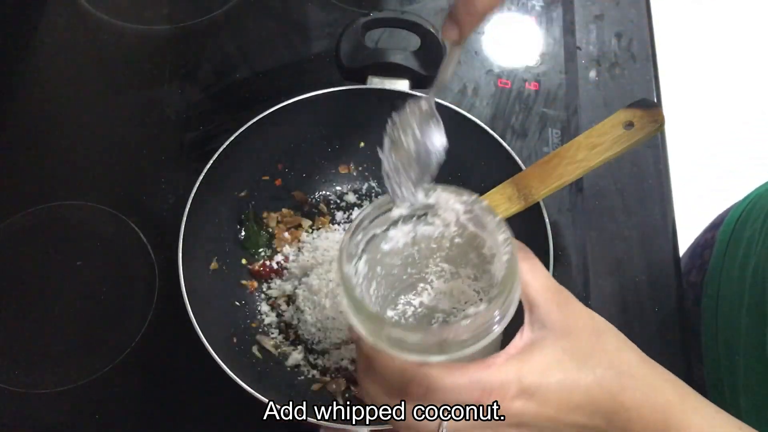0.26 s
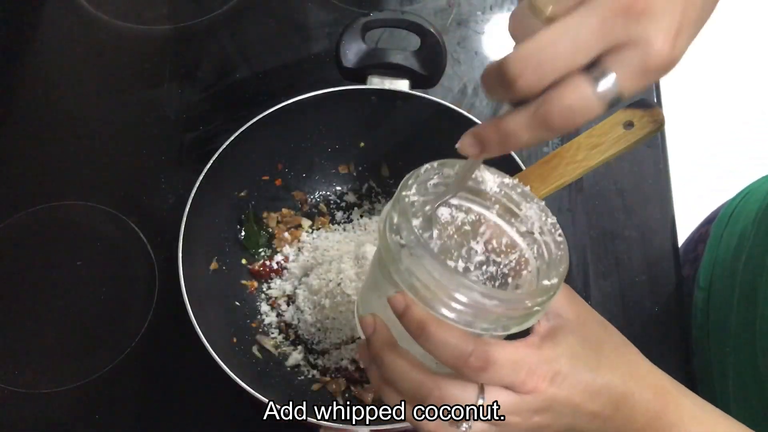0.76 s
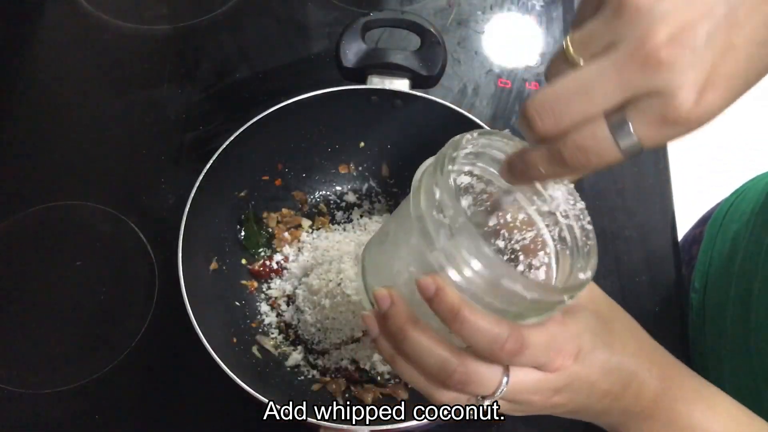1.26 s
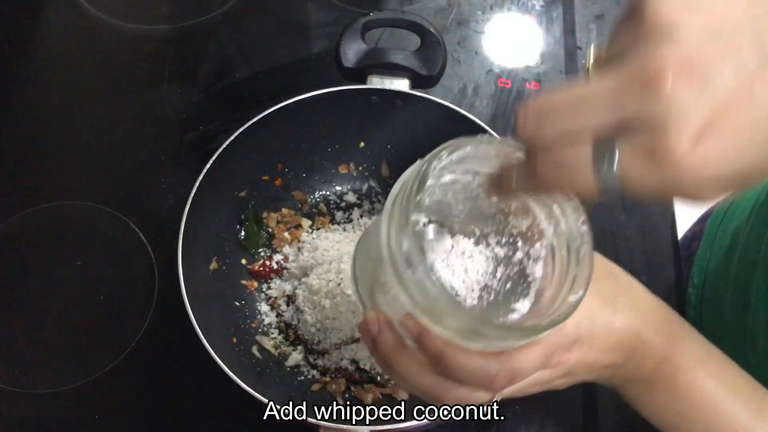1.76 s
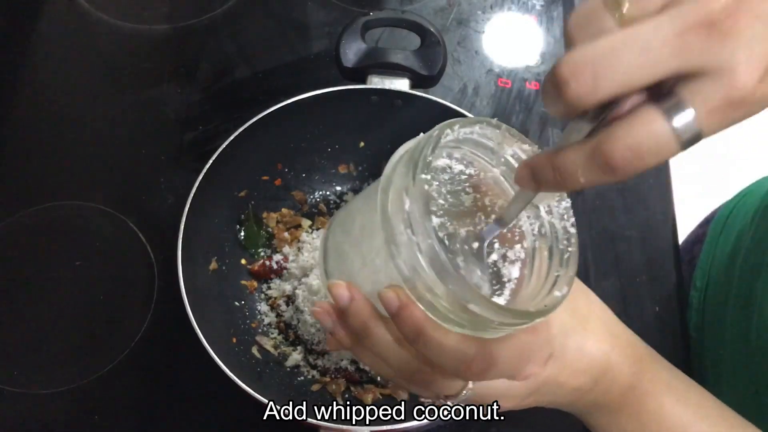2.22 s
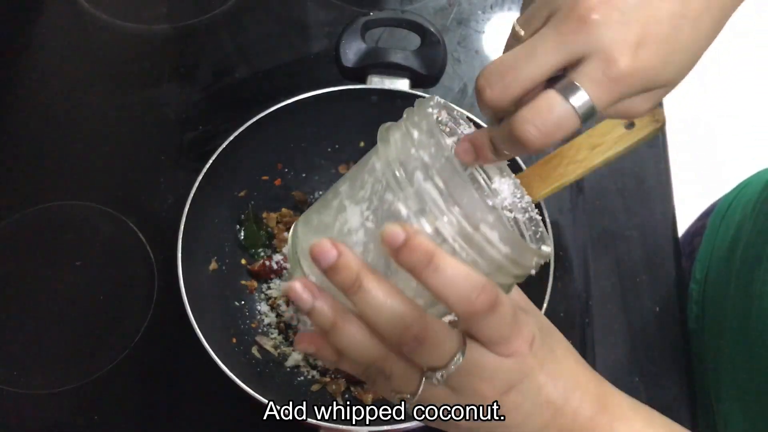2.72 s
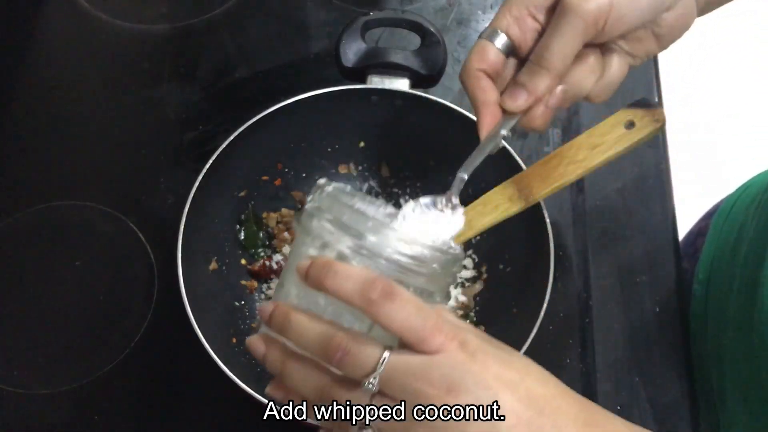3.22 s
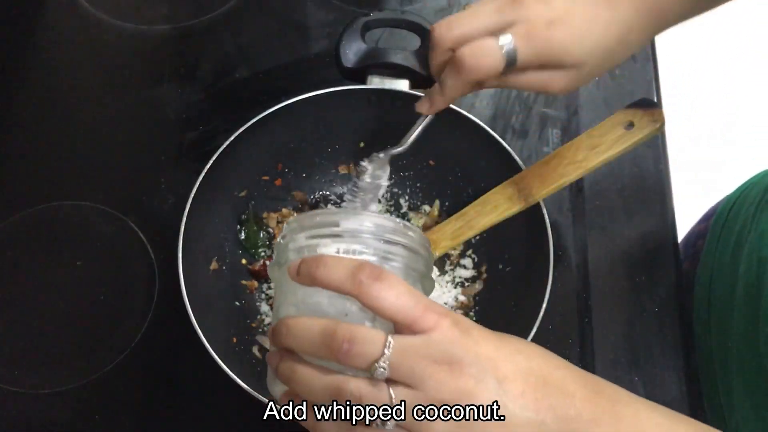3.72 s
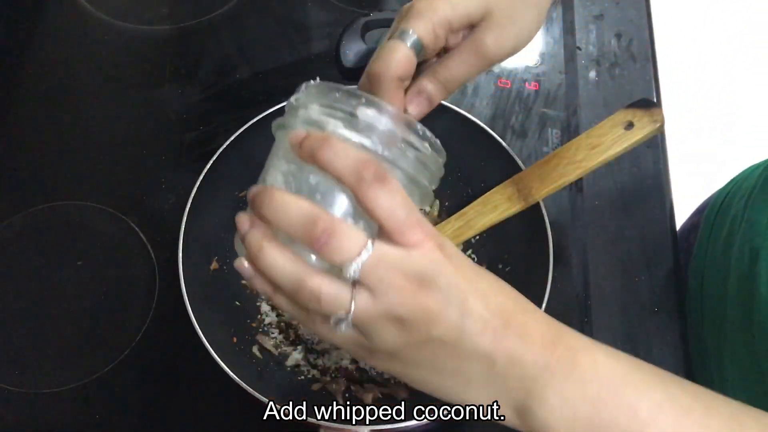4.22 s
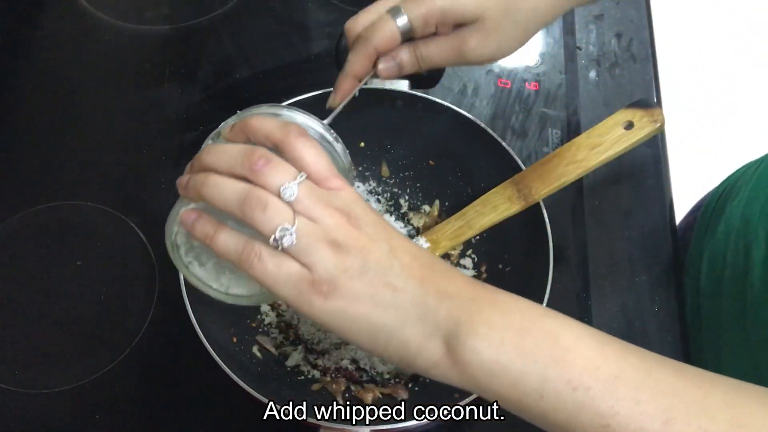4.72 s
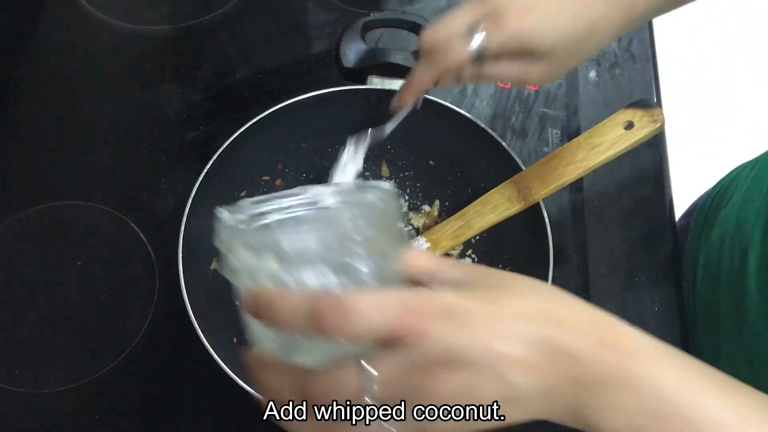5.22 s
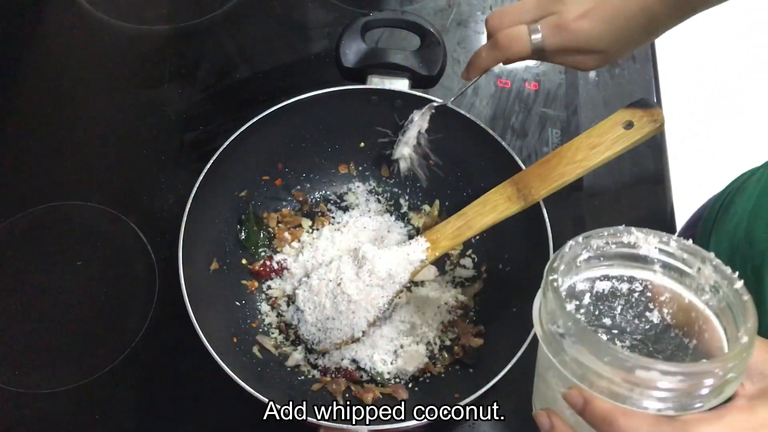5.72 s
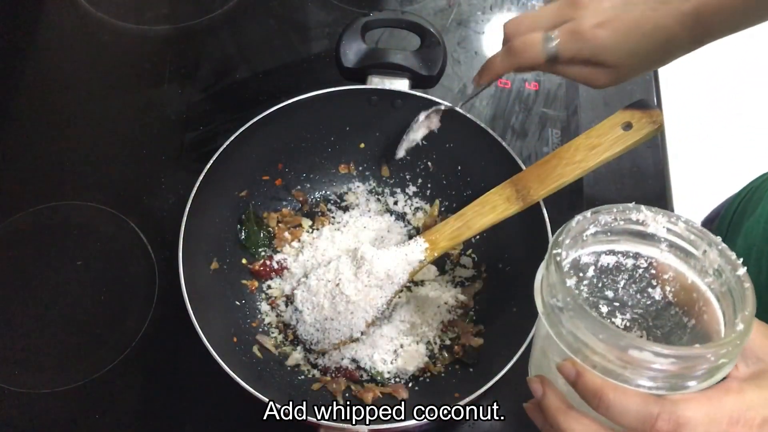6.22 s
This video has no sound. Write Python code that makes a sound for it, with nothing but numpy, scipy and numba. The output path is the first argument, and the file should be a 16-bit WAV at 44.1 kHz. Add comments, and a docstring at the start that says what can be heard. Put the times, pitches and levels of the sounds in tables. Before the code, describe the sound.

A metal spoon clinks irregularly inside a glass jar over a faintly sizzling pan, then knocks four times on the pan rim with ringing clangs.

```python
"""A hob hums and hisses under a faintly sizzling pan throughout, in a small hard kitchen.
From 0.5 to 5 s a steel spoon clinks in a hand-held glass jar of grated coconut, close to the microphone;
each contact rings the jar's wall modes, damped to a varying degree. Dry ticks, soft rubbing and low
handling rumble come between. From 5.8 s the spoon is knocked on the pan four times: a clang with
a rebound, ringing pan modes and a thump on the hob top."""
import sys
import numpy as np
from scipy import signal
from scipy.fft import rfft, irfft, next_fast_len
from scipy.io import wavfile
from scipy.ndimage import uniform_filter1d
from numba import njit

SR = 44100
rng = np.random.default_rng(int(sys.argv[2]) if len(sys.argv) > 2 else 0)


def put_to_file(sound):
    """Save the sound as 16-bit audio at rate SR, in the file named by the first command-line argument."""
    columns = np.atleast_2d(sound).T  # one column per channel
    safe = np.clip(columns, -1, 1)
    whole_steps = np.round(safe * 32767)
    wavfile.write(sys.argv[1], SR, whole_steps.astype(np.int16))


N = 285238
TIME = np.arange(N) / SR  # s
AGE = TIME[:int(.8 * SR)]  # s since a blow
TOP_HZ = 15750  # upper band limit


def undb(db):
    """Decibels to gain."""
    return 10 ** (np.asarray(db) / 20)


def unit(x):
    """Scale to rms 1."""
    return x / np.sqrt(np.mean(x ** 2))


def punch(x):
    """Scale a blow to rms 1 over its first 20 ms."""
    return x / np.sqrt(np.mean(x[:SR // 50] ** 2))


def fade(t60_s):
    """Exponential decay, 60 dB down after t60_s."""
    return np.exp(-np.log(1000) * AGE / max(t60_s, 1e-4))


def colour(x, points):
    """Filter x to a curve of (Hz, dB) points, minimum phase by folding the cepstrum."""
    hz, db = np.transpose(points)
    size = 2 * next_fast_len(len(x))
    log_hz = np.log(np.fft.rfftfreq(size, 1 / SR) + 1)
    log_gain = np.log(undb(np.interp(log_hz, np.log(hz), db)))
    cepstrum = irfft(log_gain)
    cepstrum[1:size // 2] *= 2
    cepstrum[size // 2 + 1:] = 0
    return irfft(rfft(x, size) * np.exp(rfft(cepstrum)))[:len(x)]


def band(x, low_hz, high_hz):
    """Butterworth band-pass."""
    edges_hz = [low_hz, min(high_hz, SR / 2.2)]
    return signal.sosfilt(signal.butter(2, edges_hz, "band", fs=SR, output="sos"), x)


def walk(rate_hz):
    """Slow random drift with a spread near 1: random steps, smoothed."""
    k = int(SR / rate_hz)
    steps = np.repeat(rng.standard_normal(N // k + 1), k)
    return unit(uniform_filter1d(steps, k)[:N])


def grains(rate_hz, spread_db):
    """Random tiny clicks, a few much larger than the rest."""
    size = undb(spread_db * np.minimum(rng.exponential(size=N), 5))
    present = rng.random(N) < rate_hz / SR
    return present * size * rng.standard_normal(N)


def burst(t60_s):
    """Dense chatter of a contact: decaying noise."""
    return rng.standard_normal(len(AGE)) * fade(t60_s)


def ring(modes, detune):
    """Decaying sines; each blow varies their shares, signs and (by the fraction detune) pitches."""
    out = 0
    for hz, db, t60_s in modes:
        share, shift = rng.standard_normal(2)
        tone = np.sin(2 * np.pi * hz * (1 + detune * shift) * AGE)
        out = out + rng.choice([-1, 1]) * undb(db + 2 * share) * fade(t60_s) * tone
    return punch(out)


def add(track, s, sound):
    """Mix a sound into the track at s seconds."""
    start = max(int(s * SR), 0)
    track[start:start + len(sound)] += sound[:N - start]


def swells(rows):
    """Gain of smooth hand movements: a bell curve per row."""
    return sum(undb(db) * np.exp(-2 * ((TIME - s) / length_s) ** 2) for s, length_s, db in rows)


# Kitchen reverberation. Each row: frequency in Hz, level in dB, t60 in s.
ROOM_BANDS = [(80, -1.5, 0.54), (423, -0.5, 0.61), (1080, -1.5, 0.54), (2930, -5, 0.74), (7300, -7, 0.52),
              (15000, -12.5, 0.25)]


def kitchen(x, gap_s=0.0053, build_s=0.0033):
    """Diffuse wall echoes build up shortly after the direct sound; the top treble dies first."""
    hz, level_db, t60_s = np.transpose(ROOM_BANDS)
    noise = rfft(rng.standard_normal(len(AGE)))
    log_hz = np.log(np.fft.rfftfreq(len(AGE), 1 / SR) + 1)
    onset = 1 - np.exp(-np.maximum(AGE - gap_s, 0) / build_s)
    response = 0
    for share, db, decay_s in zip(np.eye(len(hz)), level_db, t60_s):
        shape = onset * fade(decay_s)
        shape = shape / np.sqrt(np.sum(shape ** 2))
        band_noise = irfft(noise * np.interp(log_hz, np.log(hz), share), len(AGE))
        response = response + undb(db) * band_noise * shape
    return signal.fftconvolve(x, response)[:N]


# Spectrum of the steady air. Each row: frequency in Hz, relative density in dB per Hz.
AIR_SPECTRUM = [(18, -55), (30, -24), (106, 1), (131, -6.5), (204, -10.5), (233, -11.5), (426, -11.5),
                (461, -21.5), (666, -8), (1040, -11), (1810, -7.5), (2610, -12.5), (2900, -9.5),
                (8520, -11), (16000, -13.5)]
# Hob hum. Each row: centre frequency in Hz, centre rms level in dB.
HUM_TONES = [(49.5, -55.5), (102.3, -54.5), (207, -62.5)]


def hob(air_db=-44, rumble_db=-54):
    """Fan as coloured noise over low rumble, plus tones wavering in pitch and level."""
    air = unit(colour(rng.standard_normal(N), AIR_SPECTRUM)) * undb(air_db + .5 * walk(4.38))
    rumble = unit(band(rng.standard_normal(N), 34, 301)) * undb(rumble_db)
    hum = 0
    for hz, db in HUM_TONES:
        phase = 2 * np.pi * np.cumsum(hz + 1.243 * walk(6.7)) / SR
        hum = hum + undb(db + 2 * walk(6.4)) * np.sqrt(2) * np.sin(phase)
    return air + rumble + hum


# Sizzle level. Each row: time in s, level in dB before the trim.
SIZZLE_LEVEL = [(0, -38), (0.7, -39), (1.2, -40), (2.3, -41), (3.0, -42), (3.9, -39), (5.3, -36),
                (5.9, -37.5)]
# Sizzle spectrum. Each row: frequency in Hz, relative level in dB.
SIZZLE_SPECTRUM = [(1470, -39), (2500, -7.5), (3170, -11.5), (3470, -3), (3920, -20), (4300, -2.5),
                   (4930, -14), (5790, 1.5), (7390, -6), (8480, 1.5), (10500, -4), (12600, 0.5), (15500, 1)]


def sizzle(trim_db=2):
    """Tiny bubbles bursting in the oil: dense coloured clicks."""
    frying = unit(colour(grains(rate_hz=7000, spread_db=3.2), SIZZLE_SPECTRUM))
    level_db = np.interp(TIME, *np.transpose(SIZZLE_LEVEL)) + trim_db + 0.27 * walk(5.18)
    return frying * undb(level_db)


# The hand turns the jar over. Each row: middle in s, length in s, level in dB.
JAR_TURNS = [(0.45, 0.53, -50.5), (4.07, 0.33, -44), (4.6, 0.47, -49.5)]


def handling():
    """Soft low rumble of moving hands and jar: swelling low noise."""
    return unit(band(rng.standard_normal(N), 51, 107)) * swells(JAR_TURNS)


# Shreds rub on the glass, then slide off the spoon. Each row: middle in s, length in s, level in dB.
SHRED_SCRAPES = [(3.75, 0.84, -45), (4.55, 0.18, -36), (5.75, .3, -44.5)]


def scrapes():
    """Coconut shreds rubbing: dense treble clicks, flickering in level."""
    rubbing = unit(band(grains(rate_hz=4000, spread_db=2.3), 3500, 12000))
    return rubbing * undb(2 * walk(25)) * swells(SHRED_SCRAPES)


# Timed ticks: pops of the pan, crumbs, a faint spoon tap at 2.577 s, a grainy scrape at 4.446 s.
# Each row: start in s, relative level in dB, body against treble in dB.
TIMED_TICKS = [(0.155, -22.5, -12), (0.3593, -22.5, -12), (0.472, -20, -17), (2.577, -30.5, 4),
               (3.745, -22.5, -20), (3.9512, -19, -7.5), (4.0099, -21, -10), (4.4459, -18, -0.5),
               (4.5915, -17.5, -8.5), (5.2934, -21.5, -7), (5.4272, -22, -5.5), (5.558, -20.5, -15),
               (5.715, -17, -19.5)]


def ticks(trim_db=-12, snap_t60_s=0.025, tipped_s=(3.5, 5.5), crumbs_per_s=6.5,
          crumb_db=-23.5, crumb_body_db=-10, scatter_db=3):
    """Short treble bursts over a lower body; loose crumbs tick at random while the jar is tipped."""
    out = np.zeros(N)
    start_s, end_s = tipped_s
    span_s = end_s - start_s
    crumbs = []
    for when, size in rng.random((int(crumbs_per_s * span_s), 2)):
        crumbs.append((start_s + when * span_s, crumb_db + scatter_db * (2 * size - 1), crumb_body_db))
    for s, db, body_db in TIMED_TICKS + crumbs:
        snap = punch(band(burst(snap_t60_s), 5500, 16000))
        body = punch(band(burst(.014), 1300, 7000))
        add(out, s, undb(db + trim_db) * (snap + undb(body_db) * body))
    return out


# Spoon on pan. Each row: start in s, clang level in dB, thump level in dB, chatter t60 in s.
PAN_KNOCKS = [(5.8441, -11.5, -22, 0.16), (6.0445, -10.5, -24.5, 0.044), (6.2227, -11.5, -28.5, 0.031),
              (6.3632, -9.5, -26, 0.066)]
# Pan modes. Each row: frequency in Hz, relative level in dB, t60 in s.
PAN_RING_MODES = [(275, -6, .3), (550, -5, .3), (682, -5, .3), (872, -11, .3), (1034, -9, .25),
                  (1276, -11, .25), (1577, -7, .35), (1735, -2, .33), (1766, -5, .3), (1850, -6, .4),
                  (2185, -3, .35), (2240, 1, .35), (2816, -1, .4), (2893, -1, .4), (3424, -6, .3),
                  (3683, -2, .25), (5508, 6, .2), (6074, 4, .17), (6319, 4, .2), (7151, 5, .17),
                  (8140, 4, .12), (8848, 0, .15), (12000, 3, .08), (12900, 2, .08)]
# Pan bouncing on the hob top. Each row: frequency in Hz, relative level in dB, t60 in s.
HOB_TOP_MODES = [(66, -4, .3), (77, 0, .4), (92, -6, .25), (128, -7, .22), (185, -4, .25), (345, -8, .2)]
# Clang spectrum. Each row: frequency in Hz, relative level in dB.
CLANG_SPECTRUM = [(70, -9), (130, -9), (300, -3), (450, -8.5), (640, -0.5), (1150, -12), (1750, -4),
                  (2000, -9), (2240, 0), (2520, -5.5), (2870, -2), (3700, -3.5), (4300, -14), (5200, -16),
                  (5550, -2.5), (8000, -5), (10700, -10.5), (12500, -9), (14000, -16), (16000, -26)]


def pan(rebound_s=.0035, rebound_db=-2, thump_rise_s=0.0039, rumble_db=-6, ring_db=-9):
    """The spoon hits the rim, rebounds and chatters; the pan rings and thumps the hob top."""
    out = np.zeros(N)
    for s, clang_db, thump_db, t60_s in PAN_KNOCKS:
        for delay_s, db in ((0, -3), (rebound_s, rebound_db)):
            clang = punch(colour(burst(t60_s), CLANG_SPECTRUM))
            add(out, s + delay_s, undb(clang_db + db) * clang)
        add(out, s, undb(clang_db + ring_db) * ring(PAN_RING_MODES, detune=.0004))
        rumble = punch(band(burst(0.21), 61, 410))
        thump = ring(HOB_TOP_MODES, detune=0.0074) + undb(rumble_db) * rumble
        add(out, s, undb(thump_db) * thump * (1 - np.exp(-AGE / thump_rise_s)))
    return out


# Clack of spoon on glass. Each row: multiple of the clack pitch, relative level in dB, t60 in s.
CLACK_PARTIALS = [(.82, -9, 0.019), (1.001, -3.5, 0.043), (1.07, -3.5, 0.0088)]
# Jar modes: second wall mode, crack, high register. Each row: frequency in Hz, relative level in dB, t60 in s.
SECOND_MODES = [(6770, -7, .035), (6870, -2, .05), (7165, 0, .07), (7220, -7, .07)]
CRACK_RING_MODES = [(3080, -3, .03), (3260, -7, .03), (3690, -4, .03), (3950, -8, .025), (4480, -8, .02),
                    (5030, -6, .025), (5480, 1, .055), (5880, -2, .03), (6150, -3, .03), (6560, -1, .03),
                    (8050, -1, .035), (8480, -5, .025)]
HIGH_RING_MODES = [(9680, -4, .05), (9850, -6, .05), (11160, -2, .06), (11330, -6, .03), (11750, -6, .025),
                   (12960, -4, .045), (15350, -4, .05), (15580, -7, .04)]


def clink(levels_db, t60_s, wall_hz, clack_hz, high_hz, skid_t60_s, twin_ratio=1.021, twin_db=-9,
          free_db=-27, free_t60_s=0.5, rasp_db=-5, chatter_db=-2, contact_s=0.00045, focus_db=9):
    """Spoon on glass: a brief skid, the wall's split lowest mode, and other modes around it."""
    clack_db, wall_db, second_db, crack_db, high_db = levels_db
    # uneven wall thickness splits the mode into a beating pair; a little rings on once the spoon has left
    wall_modes = [(wall_hz, 0, t60_s), (wall_hz * twin_ratio, twin_db, t60_s), (wall_hz, free_db, free_t60_s)]
    wall = ring(wall_modes, detune=0.00098)
    clack = ring([(clack_hz * k, db, decay_s) for k, db, decay_s in CLACK_PARTIALS], detune=0.009)
    # the point of contact favours one register of the high modes
    high_modes = [(hz, db - focus_db * min(abs(hz - high_hz) / 1800, 1), decay_s)
                  for hz, db, decay_s in HIGH_RING_MODES]
    high = ring(high_modes, detune=.002)
    # skidding steel roughens every register; a longer skid rasps more
    rasp = punch(band(burst(skid_t60_s), 2506, 3160)) * np.sqrt(skid_t60_s / 0.1)
    chatter = punch(band(burst(skid_t60_s), 2830, 8200))
    glitter = punch(band(burst(skid_t60_s), 0.71 * high_hz, 1.24 * high_hz))
    knock = punch(band(burst(0.022), 386, 1660))
    crack = ring(CRACK_RING_MODES, detune=0.012)
    out = undb(wall_db) * (wall + undb(rasp_db) * rasp)
    out += undb(second_db - 1) * ring(SECOND_MODES, detune=.003)
    out += undb(crack_db) * (undb(-4.5) * crack + undb(chatter_db) * chatter)
    out += undb(high_db) * (undb(-1.5) * high + undb(-4.0) * glitter)
    out += undb(clack_db) * (undb(0.5) * clack + undb(-8.5) * knock)
    return out * (1 - np.exp(-AGE / contact_s))


CLACK_HZ, HIGH_HZ = 897, 11560  # usual clack pitch and high register


def pressed_wall_hz(t60_s, free_hz=2699, press_hz_s=1.568):
    """A spoon that stays pressed on damps the first wall mode and raises its pitch."""
    return free_hz + press_hz_s / t60_s


# Brushes of the rim. Each row: start in s, ring level in dB, ring t60 in s, pitch in Hz.
RIM_TOUCHES = [(2.1025, -30.5, 0.035, 3013), (2.6986, -27.5, .055, 2730), (3.2701, -21, 0.03, 2772),
               (3.313, -26, 0.08, 2704), (3.323, -24, 0.1, 2785), (4.0513, -24.5, 0.26, 2722),
               (4.622, -32, 0.32, 2726), (4.95, -19.5, .22, 2760), (5.037, -27, 0.034, 2760)]


def rim_touches(clack_db=-25, second_db=-11, crack_db=-14, high_db=-22, skid_t60_s=0.054):
    """A soft contact wakes little but the first wall mode."""
    out = np.zeros(N)
    for s, db, t60_s, hz in RIM_TOUCHES:
        levels_db = db + np.array([clack_db, 0, second_db, crack_db, high_db])
        add(out, s, clink(levels_db, t60_s, hz, CLACK_HZ, HIGH_HZ, skid_t60_s))
    return out


# Spoon tip on the bottom. Each row: start in s, strength in dB, then against it wall ring in dB and
# clack in dB, clack pitch in Hz, brightness in dB against strength, skid t60 in s.
BOTTOM_CLACKS = [(1.1892, -18, -13, -16.5, 772, -3, .03), (1.525, -19, -11, -8, 860, 2, 0.022),
                 (1.5893, -19, -6.5, -16.5, 870, 6, 0.1), (1.9218, -18, -6, -12, 827, 0, 0.017),
                 (2.658, -20, -10, -6.5, 880, 2, 0.028), (4.143, -18, -5, -8.5, 918, 1.5, 0.033)]


def bottom_clacks(second_db=-11, t60_s=0.075, glance_db=2, register_hz_per_db=850):
    """The thick bottom cracks and clacks, hardly rings; bright glancing blows wake the topmost modes."""
    out = np.zeros(N)
    for s, db, wall_db, clack_db, clack_hz, bright_db, skid_t60_s in BOTTOM_CLACKS:
        high_hz = min(HIGH_HZ + register_hz_per_db * max(bright_db - glance_db, 0), TOP_HZ)
        levels_db = db + np.array([clack_db, wall_db, second_db, 0, bright_db])
        add(out, s, clink(levels_db, t60_s, pressed_wall_hz(t60_s), clack_hz, high_hz, skid_t60_s))
    return out


# Spoon on the side. Each row: start in s, strength in dB, ring t60 in s, second wall mode against first in dB,
# brightness in dB and clack in dB against strength, clack pitch in Hz, skid t60 in s.
SIDE_STRIKES = [(0.5224, -25.5, 0.054, 2.5, 6, -14, 912, .03),
                (0.703, -22.5, .037, 7, -5.5, -30, 880, .045), (0.9663, -36, .06, -1, -10, -22, 885, .02),
                (0.9758, -17, 0.19, -5.5, 0, -31, 920, 0.015),
                (1.2506, -21.5, 0.12, -7.5, 2.5, -14.5, 910, 0.034),
                (1.7724, -24, 0.17, 0.5, 1.5, -23, 1044, 0.0099),
                (2.5369, -23.5, 0.0328, -0.5, -5, -12, 1220, 0.01),
                (2.7537, -23.5, 0.044, 0.5, 1.5, -10, 878, .07),
                (4.2301, -21, .06, -17.5, 5, -15.5, 933, .009),
                (4.898, -17, 0.082, -2, -11, -24, 880, 0.039),
                (4.941, -27.5, 0.033, -1, -1, -17, 935, 0.043)]


def side_strikes(ring_db=5, trade=0.37, register_hz=12300, register_hz_per_db=130):
    """The side rings loudly; the place struck trades first wall mode for second, moving the high register."""
    out = np.zeros(N)
    for s, db, t60_s, second_db, bright_db, clack_db, clack_hz, skid_t60_s in SIDE_STRIKES:
        wall_db = ring_db - trade * second_db
        high_hz = register_hz + register_hz_per_db * second_db
        levels_db = db + np.array([clack_db, wall_db, wall_db + second_db, 0, bright_db])
        add(out, s, clink(levels_db, t60_s, pressed_wall_hz(t60_s), clack_hz, high_hz, skid_t60_s))
    return out


def jar(side_room_db=-3.5, bottom_room_db=-4, rim_room_db=-6.0):
    """All contacts of spoon and jar. Returns (direct, sent to the room)."""
    side, bottom, rim = side_strikes(), bottom_clacks(), rim_touches()
    sent = undb(side_room_db) * side + undb(bottom_room_db) * bottom + undb(rim_room_db) * rim
    return side + bottom + rim, sent


def scene():
    """The jar is close to the microphone; the pan is further off and stirs the room more."""
    steady = hob() + sizzle() + handling() + scrapes()
    small_ticks, knocks = ticks(), pan()
    clinks, sent = jar()
    echoes = kitchen(sent + small_ticks + knocks)
    return (clinks + small_ticks + knocks + echoes + steady)[None]


@njit
def follow(x, attack, release):
    """Level follower that rises fast and falls slowly."""
    out, level = np.empty(len(x)), 0.
    for i in range(len(x)):
        level += (x[i] - level) * (attack if x[i] > level else release)
        out[i] = level
    return out


def record(dry, threshold=0.43, attack_s=0.0019, release_s=0.45, drive_db=2.0):
    """Gain ducks after loud blows and recovers slowly; peaks are rounded, lows and top cut."""
    level = follow(np.abs(dry[0]), 1 / (1 + attack_s * SR), 1 / (1 + release_s * SR))
    held = undb(drive_db) * dry / np.sqrt(1.5 + (level / threshold) ** 2)
    held = signal.sosfilt(signal.butter(3, 42, "high", fs=SR, output="sos"), held)  # microphone low cut
    rounded = held / (1 + held ** 6) ** (1 / 6)
    return signal.sosfilt(signal.ellip(10, .2, 70, TOP_HZ, fs=SR, output="sos"), rounded)


dry = scene()
out = record(dry)
put_to_file(out)
```